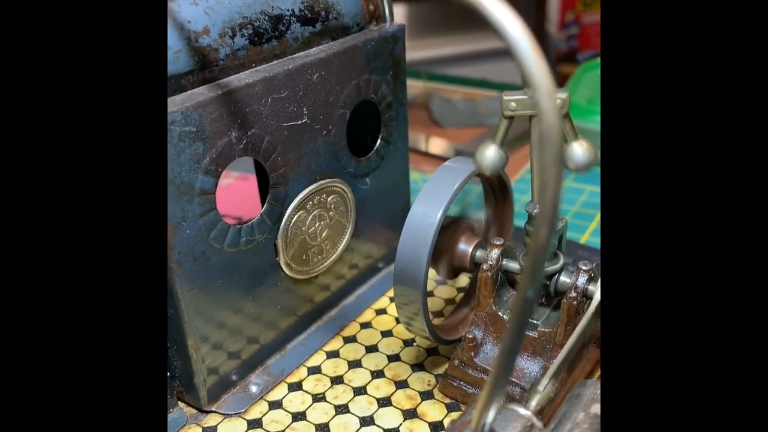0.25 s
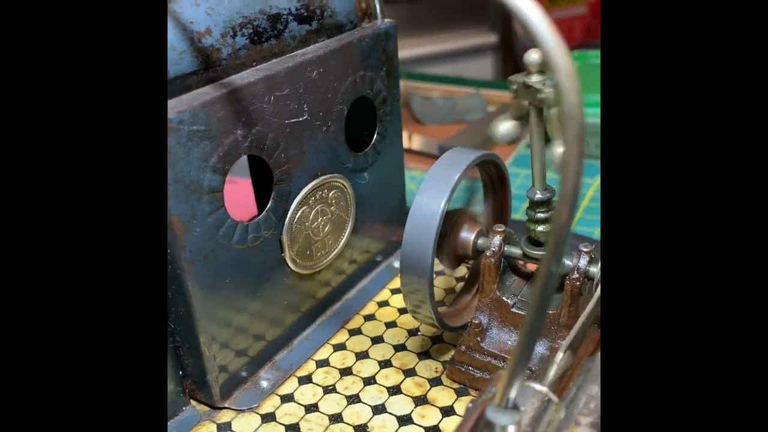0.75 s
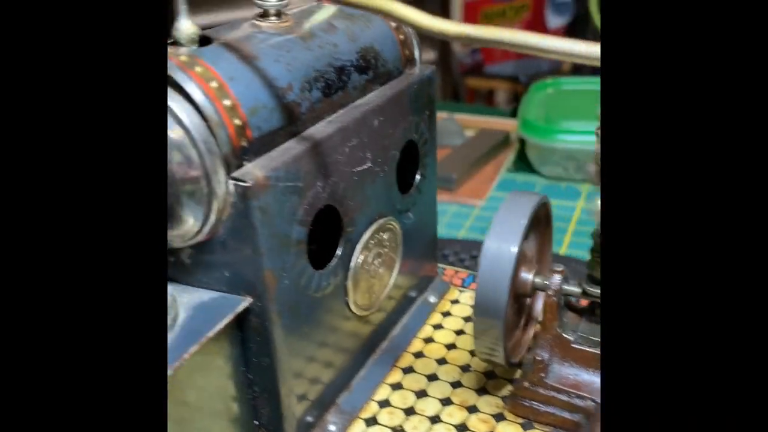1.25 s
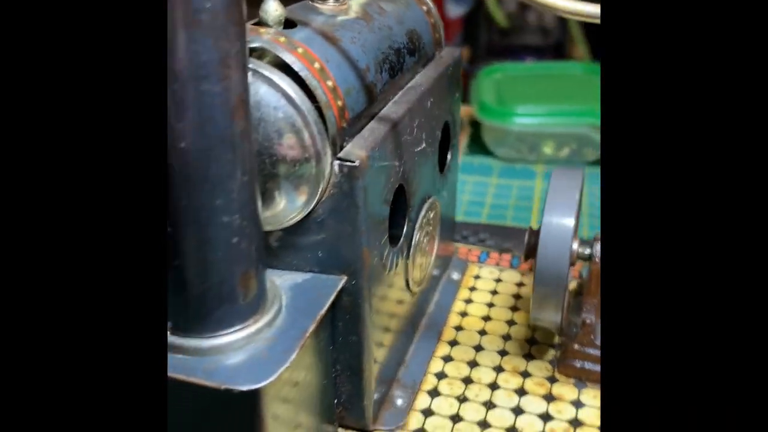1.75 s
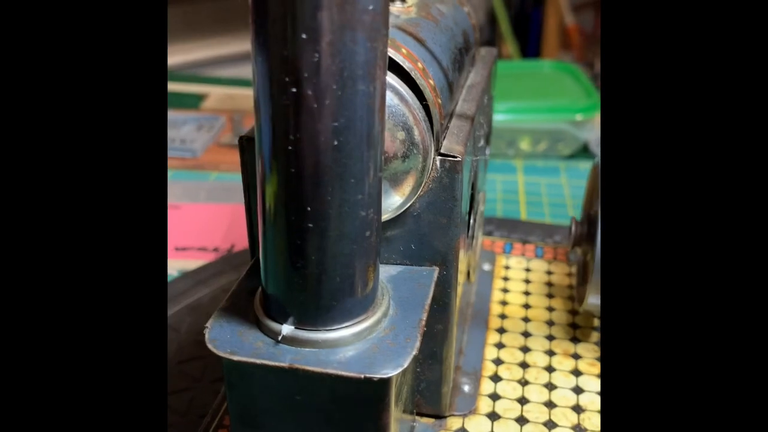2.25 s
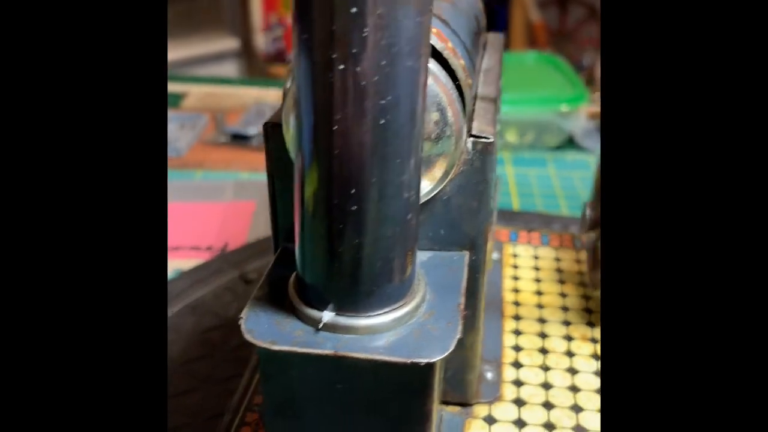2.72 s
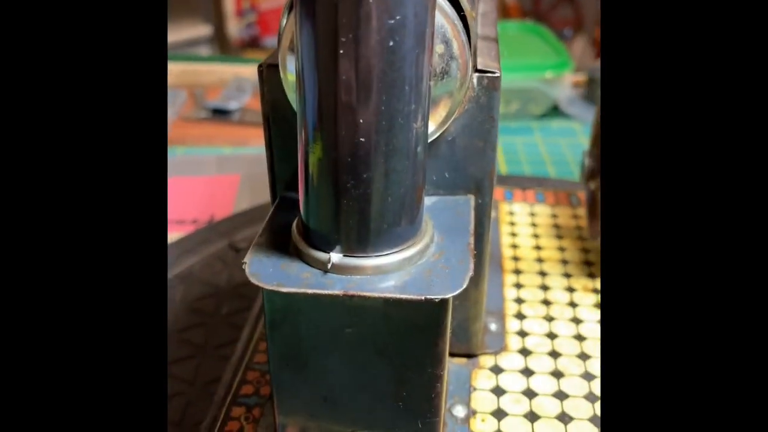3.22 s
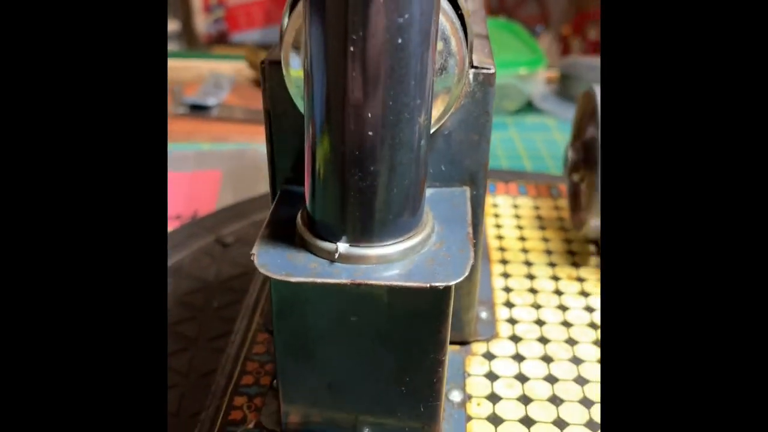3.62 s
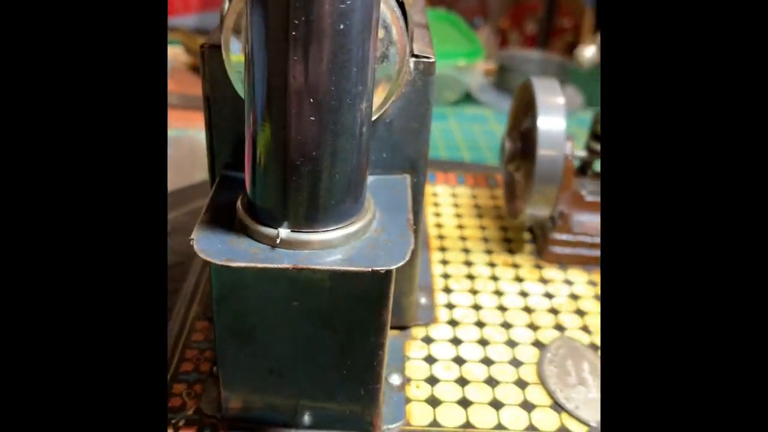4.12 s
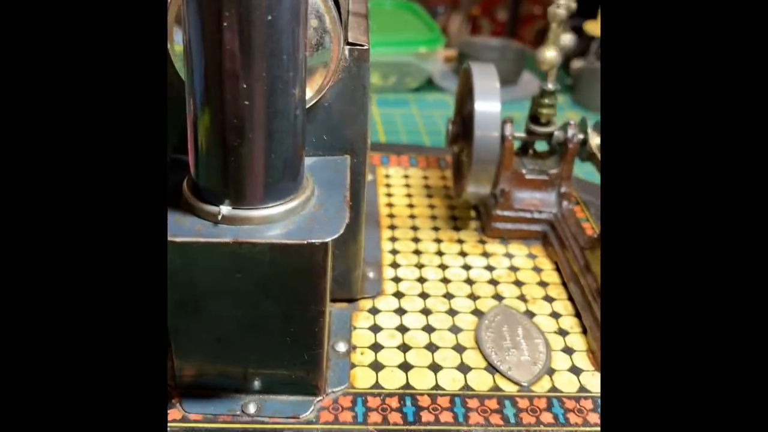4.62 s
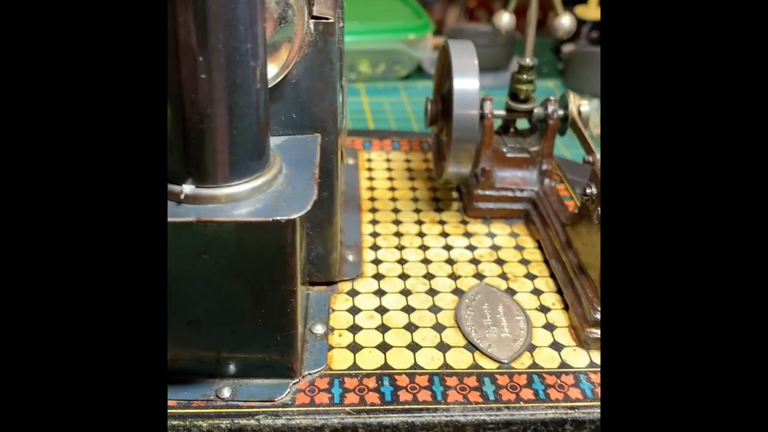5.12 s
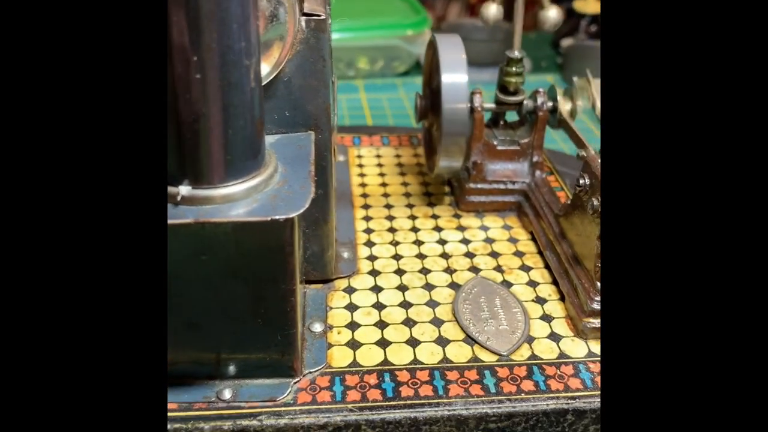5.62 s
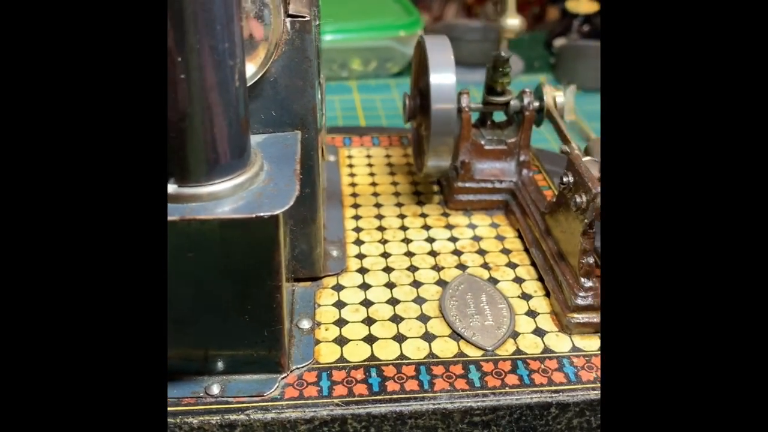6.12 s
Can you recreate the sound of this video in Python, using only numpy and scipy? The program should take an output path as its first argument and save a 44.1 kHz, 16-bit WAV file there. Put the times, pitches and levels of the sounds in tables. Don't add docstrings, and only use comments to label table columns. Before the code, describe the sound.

Continuous rapid patter from a small tin engine on a workbench: hollow firebox and boiler clanks, brighter chimney pings, steely rod jingle, hissing valve and clipped exhaust puffs, fusing into a buzzing chug. Faint room hum and air leak sit underneath. Close stereo phone pickup, short dry reflections, slightly gritty compressed treble; the engine stays steady while the distance slowly grows.

```python
import sys
import numpy as np
from scipy import signal
from scipy.fft import rfft, irfft, next_fast_len
from scipy.io import wavfile
from scipy.ndimage import uniform_filter1d, map_coordinates

SR = 44100
rng = np.random.default_rng(int(sys.argv[2]) if len(sys.argv) > 2 else 0)


def voltage_ratio(decibels):
    exponent = np.asarray(decibels, float) / 20
    return 10 ** exponent


def waveform_to_disk(signal):
    frames = np.transpose(np.atleast_2d(signal))
    scaled = np.clip(frames, -1, 1) * 32767
    samples = np.round(scaled).astype(np.int16)
    wavfile.write(sys.argv[1], SR, samples)


N = 280917
LEAD = 4096

# turns done, time in seconds.
FLYWHEEL = [(0, .0018), (4, .2619), (8, .5249), (12, .7915), (22, 1.4595), (26, 1.7259), (39, 2.589),
            (46, 3.0514), (50, 3.317), (59, 3.9177), (66, 4.3874), (73, 4.8547), (79, 5.251), (84, 5.583),
            (88, 5.8517), (95, 6.3247)]
# time in seconds, level from distance in dB, level from the way the chimney faces in dB.
PHONE = [(0, 0, 0), (.5, 0, 0), (1, 0, -1.5), (1.5, -.2, -3), (1.9, -.3, -2), (2.7, -1.3, -3),
         (3.2, -.8, -3.2), (3.6, -1.3, -5), (4.2, -2, -2.8), (4.7, -2.1, -5), (5.1, -2.2, -2.3),
         (6.4, -2.2, -2.6)]
# time in seconds, level in dB.
BOILER_VIEW = [(0, -1), (1, -3), (1.6, -1.5), (2.2, 1), (3.8, 1.5), (4.3, 0), (6.4, 1)]

# milliseconds from the main blow, level in dB.
FIREBOX_KNOCKS = [
    (-12.4, -21.1),
    (-9.3, -13.1),
    (-7.48, -9.0),
    (-5.33, -19.8),
    (-3.56, -10.2),
    (-2.18, 0.0),
    (1.2, -18.8),
    (4.24, -8.1),
    (27.1, -21.2),
]
CHIMNEY_KNOCKS = [
    (-10.36, -15.1),
    (-7.73, -9.9),
    (-6.62, -11.8),
    (-4.67, -9.8),
    (-3.97, -10.2),
    (-2.63, 0.0),
    (-2.11, -1.3),
    (-0.88, -3.8),
    (-0.29, -7.5),
    (9.02, -17.8),
]
# milliseconds from the main blow, level in dB.
LOOSE_PLAY = [
    (-24.5, -13),
    (-16.5, -13),
    (-9.5, -9),
    (13, -17),
    (24.5, -17),
]
# milliseconds from the main blow, level in dB.
SHAKE = [(-33, -18), (-12, -15), (-4, -6), (0, 0), (6, -6), (14, -11), (33, -18)]
# milliseconds from the main blow, level in dB.
ROD_CLATTER = [(-18, -14), (-11.5, -5), (-8.5, -9), (-5, 0), (-3.2, -3), (-1.2, -8), (2, -9), (4.5, -8),
               (8, -5), (10.5, -9), (13, -11), (19.5, -13), (24.5, -20)]
# milliseconds from the main blow, level in dB.
VALVE_TICKS = [
    (-12.8, -15),
    (-10, -19),
    (-6, -8),
    (-4, 0),
    (8.3, -10),
]
# milliseconds from the main blow, level in dB.
FLOW = [(-20, -30), (-12, -19), (-6, -14), (-3.5, 0), (2, -4), (7, -7), (11, -5), (15, -11), (20, -15),
        (30, -30)]
# milliseconds from the main blow, level in dB.
BENCH_PUSHES = [
    (0.52, -0.5),
    (15.26, -4.2),
    (16.85, 0.0),
    (18.68, -2.0),
    (20.52, -5.4),
    (25.94, -3.3),
]

# pitch in Hz, width in Hz, level in dB.
FIREBOX = [(430.8, 70, -11.5), (578.3, 77.9, -0.2), (757.1, 237.8, -4.5), (925.7, 136.7, -10.5)]
BOILER = [(985, 70, -7), (1080, 110, -4), (1200, 110, 0), (1330, 110, -3)]
CHIMNEY = [(1545, 55, -3), (1920, 170, .5), (2160, 130, 1)]
RODS = [(2490, 60, -3), (2790, 170, -4), (3200, 120, -8), (3600, 130, -4), (3760, 40, -1.5), (3950, 90, -7),
        (4150, 80, -5), (4700, 180, -1), (5100, 200, -5), (5400, 120, -5), (5900, 200, -1), (6400, 300, -5),
        (6800, 150, 0), (7400, 250, -6)]
BENCH = [(74.3, 20.6, 7.9), (194.7, 928.3, -1.8)]

# frequency in Hz, level in dB per Hz.
HISS = [(1800, -60), (2400, -12), (4000, -6), (6000, -3), (7000, -1), (7900, -5), (9000, -2), (11000, -5),
        (13000, -9), (15000, -11), (16300, -22)]
PUFF = [(2500, -60), (4000, -26), (6000, -22), (8200, -11), (8900, -10), (9900, -1.5), (11000, 0),
        (12500, -7.5), (14000, -15), (15200, -17), (16300, -30)]
SHOP = [(15, -36), (30, -11), (70, -5), (150, -13), (200, -6), (400, -11), (650, -7), (1010, -16),
        (2150, -17), (2500, -21), (5400, -24), (7000, -26), (10100, -28), (15200, -36), (16600, -70)]
# pitch in Hz, level in dB, unsteadiness in Hz.
HUM = [(28, -49, 0.6), (57, -45, 1.5), (302, -44, 1.5), (360, -45, 1.5)]
# frequency in Hz, time to fall by 60 dB in seconds.
TIN_ROOM = [(200, .1), (2000, .1), (10000, .09)]

# frequency in Hz, left minus right level in dB.
PORT_DB = [(60, -.4), (220, -1.6), (380, -.3), (480, -2), (600, -8.5), (750, -3.5), (900, -6), (1000, -2.5),
           (1150, -4), (1700, 0), (2200, -2.4), (2450, 0), (15000, 0)]
# frequency in Hz, lead in radians.
PORT_LEAD = [(0, 0), (300, -.05), (520, -.95), (750, -.85), (900, -1.4), (1000, .3), (1350, -.2),
             (1600, .45), (2100, .9), (2350, 2.3), (3700, 1.2), (5400, 3.14), (11600, 9.42), (22050, 19)]
# frequency in Hz, likeness from 0 to 1.
ALIKE = [(60, .99), (300, .8), (800, .7), (1000, .2), (1400, .3), (1700, .9), (2100, .85), (2350, .4),
         (3500, .4), (5400, .93), (6500, .86), (11000, .99), (14000, .93)]
# frequency in Hz, limit against the usual level in dB.
STARVED = [(2500, -40), (4500, -12), (9000, -11), (12000, -8.5), (16000, -8)]

FIREBOX_DB, CHIMNEY_DB, VALVE_DB, PUFF_DB = -9.1, -13.3, -21, -12.2
UNEVEN_DB = [.3, .4, .5, .8]
RODS_DB = -23.5
BOILER_LEAD_MS = 1.5
PUFF_LAG = .2745
PUFF_LAG_SCATTER_MS = .25
PUFF_FADES = 2.6
PORT_SHOWS = .5
VALVE_HIDES = .8
TOP_HZ = 15720


def along(points, hz):
    f, v = np.transpose(points)
    return np.interp(np.log(hz + 1), np.log(f + 1), v)


def unit(x):
    return x / np.sqrt(np.mean(x ** 2) + 1e-20)


def filtered(x, response):
    m = next_fast_len(x.shape[-1] + SR // 4)
    spectrum = rfft(x, m) * response(np.fft.rfftfreq(m, 1 / SR))
    return irfft(spectrum, m)[..., :x.shape[-1]]


def wobble(knots):
    return map_coordinates(rng.standard_normal(knots + 4), [np.linspace(1, knots, N + 2 * LEAD)])


def white():
    return rng.standard_normal((2, N + 2 * LEAD))


def noise(spectrum):
    return unit(filtered(white(), lambda f: voltage_ratio(along(spectrum, f))))


def ringing(modes, lo_hz, hi_hz):
    def response(f):
        body = 0
        for k, (centre, width, db) in enumerate(modes):
            damping = 1j * f * width
            body = body + (-1) ** k * voltage_ratio(db) * damping / (centre * centre - f * f + damping)
        return body / np.sqrt((1 + (lo_hz / (f + 1)) ** 16) * (1 + (f / hi_hz) ** 16))
    return response


def blows_s():
    done, s = np.transpose(FLYWHEEL)
    return np.interp(np.arange(done[-1] + 1), done, s)


def strengths():
    s, far_db, facing_db = np.transpose(PHONE)
    far_db = np.interp(blows_s(), s, far_db)
    facing_db = np.interp(blows_s(), s, facing_db)
    screen_db = VALVE_HIDES * np.interp(blows_s(), *np.transpose(BOILER_VIEW))
    steady = [FIREBOX_DB + far_db,
              CHIMNEY_DB + far_db + facing_db,
              VALVE_DB + far_db - screen_db,
              PUFF_DB + PUFF_FADES * far_db - PORT_SHOWS * facing_db]
    uneven = rng.standard_normal((len(far_db), len(steady))) * UNEVEN_DB
    return np.array(steady) + uneven.T


def knocks(pattern, turn_db, scatter_db, scatter_ms, delay_ms=0):
    ms, db = np.transpose(pattern)
    chance = rng.standard_normal((len(blows_s()), len(ms), 2))
    after_ms = ms + np.reshape(delay_ms, (-1, 1)) + scatter_ms * chance[..., 0]
    s = blows_s()[:, None] + after_ms / 1000
    size = voltage_ratio(np.reshape(turn_db, (-1, 1)) + db + scatter_db * chance[..., 1])
    place = np.round(s * SR).astype(int).ravel() + LEAD
    return np.bincount(place, size.ravel(), N + 2 * LEAD)


def each_turn(shape, turn_db):
    ms, db = np.transpose(shape)
    t_ms = np.arange(-LEAD // 2, LEAD // 2) * 1000 / SR
    curve = voltage_ratio(np.interp(t_ms, ms, db, -90, -90))
    return signal.fftconvolve(knocks([(0, 0)], turn_db, 0, 0), curve, "same")


def decaying(train, rise_ms, fall_ms):
    t_ms = np.arange(SR // 40) * 1000 / SR
    swell = (1 - np.exp(-t_ms / rise_ms)) * np.exp(-t_ms / fall_ms)
    return signal.fftconvolve(train, swell)[:len(train)]


def tinwork(firebox_db, chimney_db):
    boiler_db = np.interp(blows_s(), *np.transpose(BOILER_VIEW))
    box = ringing(FIREBOX, 370, 1080)
    boiler = ringing(BOILER, 880, 1500)
    pipe = ringing(CHIMNEY, 1000, 2330)

    box_blows = knocks(FIREBOX_KNOCKS, firebox_db + 43.8, .35, .025)
    box_blows = box_blows + knocks(LOOSE_PLAY[1:], firebox_db + 36, 3, .3)
    boiler_blows = knocks(CHIMNEY_KNOCKS, boiler_db + 20.5, .5, .03, -BOILER_LEAD_MS)
    boiler_blows = boiler_blows + knocks(LOOSE_PLAY[3:], boiler_db + 25, 2, .3)
    pipe_blows = knocks(CHIMNEY_KNOCKS, chimney_db + 35.5, .8, .02)
    pipe_blows = pipe_blows + knocks(LOOSE_PLAY, chimney_db + 34.5, 2, .3)
    struck = filtered(pipe_blows, pipe) - filtered(box_blows, box) - filtered(boiler_blows, boiler)

    rough = each_turn(SHAKE, firebox_db - 15) * unit(filtered(white(), box))
    rough = rough + each_turn(SHAKE, boiler_db - 23.5) * unit(filtered(white(), boiler))
    rough = rough + each_turn(SHAKE, chimney_db - 8) * unit(filtered(white(), pipe))
    return struck * [[1], [0]] + rough


def rods():
    rattle = decaying(knocks(ROD_CLATTER, RODS_DB + 20.5, 1.2, .4), .3, 1.1)
    rattle = rattle + voltage_ratio(-29 + 2.5 * wobble(knots=90))
    return filtered(rattle * white(), ringing(RODS, 2300, 8000))


def valve(hiss_db):
    spurts = decaying(knocks(VALVE_TICKS, hiss_db + 4.5, 2, .35), .3, .8)
    return (each_turn(FLOW, hiss_db - 2.5) + spurts) * noise(HISS)


def exhaust(puff_db):
    turn_ms = np.gradient(blows_s()) * 1000
    delay_ms = PUFF_LAG * turn_ms + PUFF_LAG_SCATTER_MS * rng.standard_normal(len(puff_db))
    spits = knocks([(-.6, -12), (.4, 0), (1.4, -3)], puff_db + 8.7, .7, .15, delay_ms)
    return decaying(spits, .6, 1.1) * noise(PUFF)


def bench():
    pushes = knocks(BENCH_PUSHES, np.full(len(blows_s()), 14.5), 1.5, .15)
    return filtered(pushes, ringing(BENCH, 25, 330)) * [[1], [0]]


def workshop():
    t = np.arange(N + 2 * LEAD) / SR
    lines = 0
    for hz, db, waver in HUM:
        level = voltage_ratio(db + 3 + 1.3 * wobble(knots=25))
        cycles = hz * t + np.cumsum(waver * wobble(knots=40)) / SR
        lines = lines + level * np.sin(2 * np.pi * cycles)
    return voltage_ratio(-35.5 + 1.2 * wobble(knots=60)) * noise(SHOP) + lines * [[1], [.3]]


def echoes(x):
    hz, t, z = signal.stft(rng.standard_normal((2, SR // 4)), SR, nperseg=256)
    fading = voltage_ratio(-60 * t / along(TIN_ROOM, hz)[:, None])
    tail = signal.istft(z * fading, SR, nperseg=256)[1]
    tail = tail / np.linalg.norm(tail[0])
    late = np.pad(x, (480, 0))[None]
    return signal.fftconvolve(late, tail, axes=1)[:, :len(x)]


def ports(pair):
    def shares(f):
        angle = np.arccos(np.clip(along(ALIKE, f), -1, 1)) / 2
        return np.array([np.cos(angle), np.sin(angle)])

    def left(f):
        return voltage_ratio(along(PORT_DB, f)) * np.exp(1j * np.interp(f, *np.transpose(PORT_LEAD)))

    same, other = filtered(pair, shares)
    return np.array([filtered(same + other, left), same - other])


def scene():
    firebox_db, chimney_db, hiss_db, puff_db = strengths()
    engine = tinwork(firebox_db, chimney_db) + rods() + valve(hiss_db) + exhaust(puff_db) + bench()
    heard = engine + voltage_ratio(-23.5) * echoes(engine[0]) + workshop()
    return ports(heard)[:, LEAD:LEAD + N]


def starved(x):
    halves = np.array([x[0] + x[1], x[0] - x[1]]) / 2
    hz, t, z = signal.stft(halves, SR, nperseg=256)
    band = np.arange(len(hz)) // 4 * 4
    power = uniform_filter1d(np.abs(z) ** 2, size=4, axis=1, origin=-2)
    power = uniform_filter1d(power, size=3, axis=2)[:, band]
    usual = np.median(power.sum(axis=0), axis=1)[:, None]
    need_db = 3.5 * rng.standard_normal(len(t) // 8 + 1)[np.arange(len(t)) // 8]
    need_db = need_db + 1.2 * wobble(knots=40)[(t * SR).astype(int)]
    kept = power > usual * voltage_ratio(along(STARVED, hz)[:, None] + need_db) ** 2
    kept |= (power >= power[::-1]) & (hz[:, None] < 13000)
    mid, side = signal.istft(z * kept, SR, nperseg=256)[1][:, :N]
    return np.array([mid + side, mid - side])


def low_pass(x):
    return signal.sosfilt(signal.butter(12, 16640, fs=SR, output="sos"), x)


def record(dry):
    held = dry / (1 + np.abs(dry / 1.05) ** 6) ** (1 / 6)
    cut = filtered(starved(held), lambda f: (f < 16600) / np.sqrt(1 + (f / TOP_HZ) ** 90))
    return low_pass(cut)


dry = scene()
out = record(dry)
waveform_to_disk(out)
```